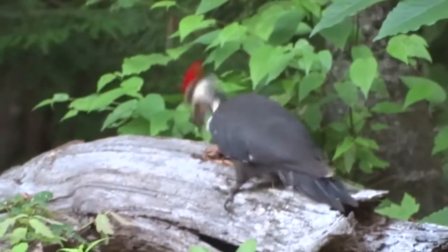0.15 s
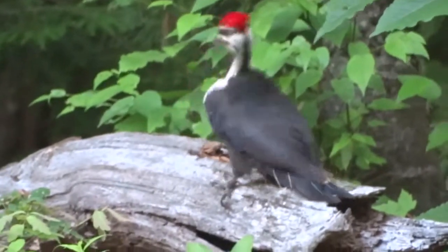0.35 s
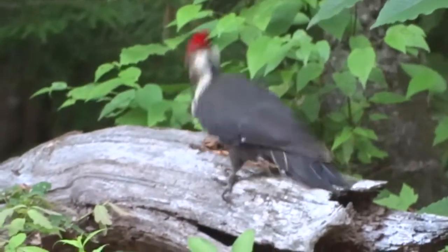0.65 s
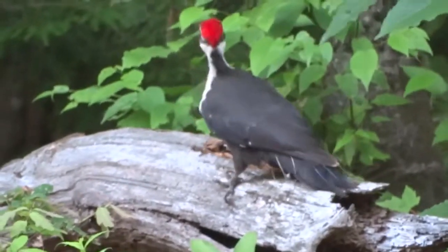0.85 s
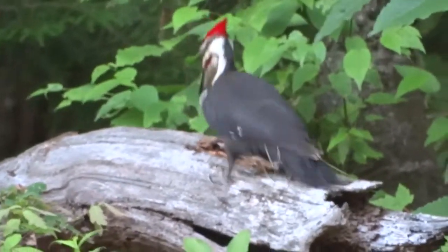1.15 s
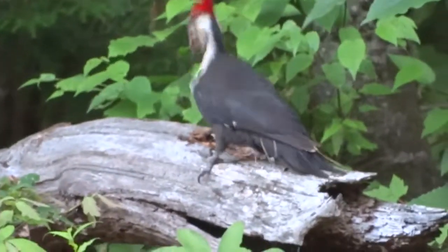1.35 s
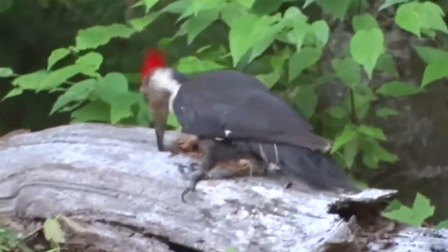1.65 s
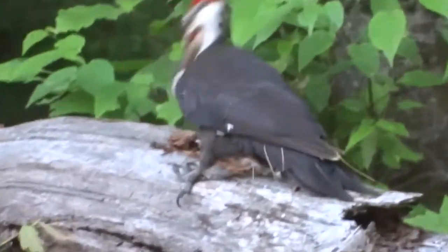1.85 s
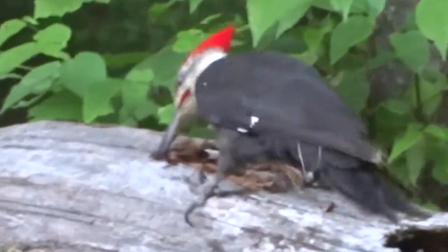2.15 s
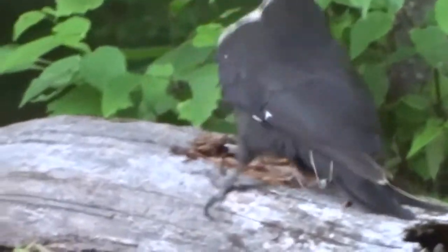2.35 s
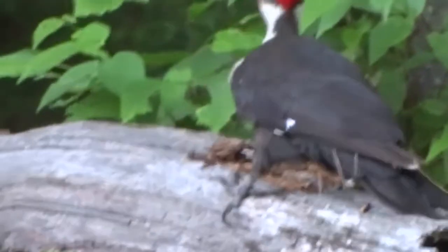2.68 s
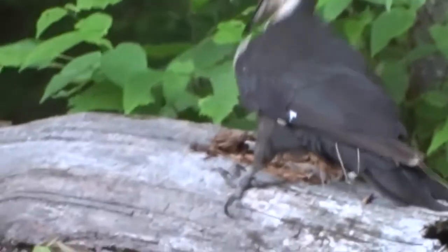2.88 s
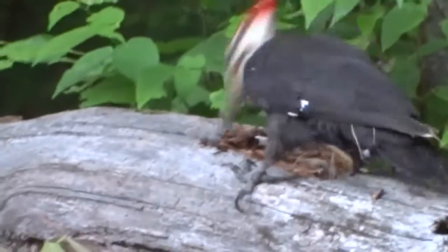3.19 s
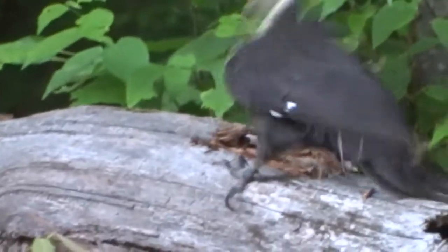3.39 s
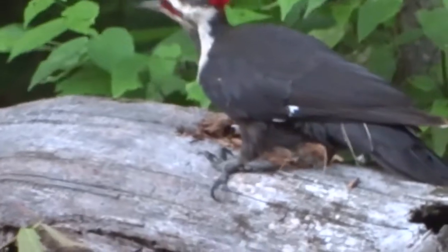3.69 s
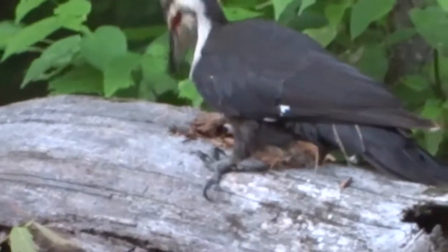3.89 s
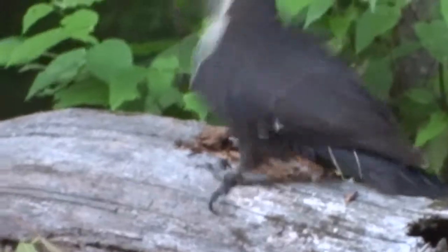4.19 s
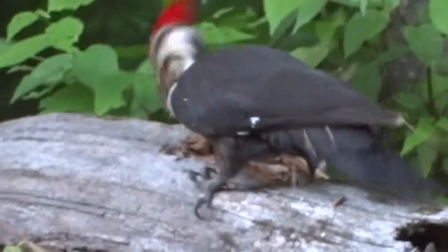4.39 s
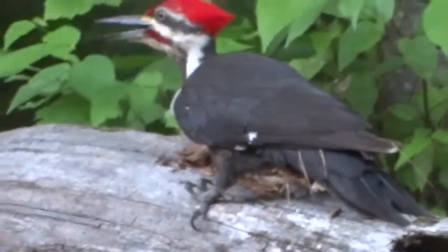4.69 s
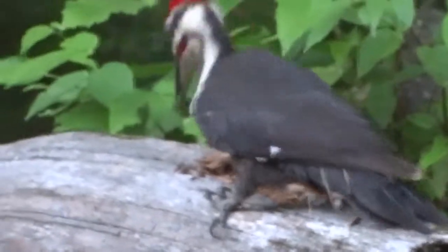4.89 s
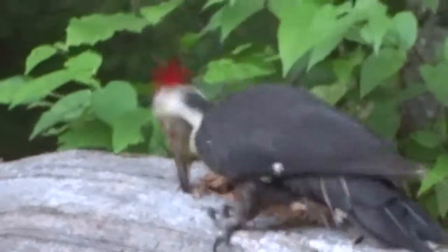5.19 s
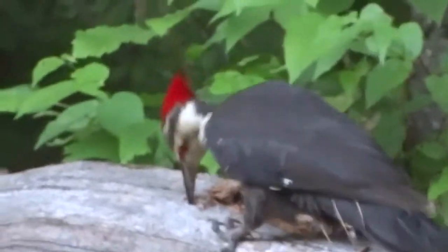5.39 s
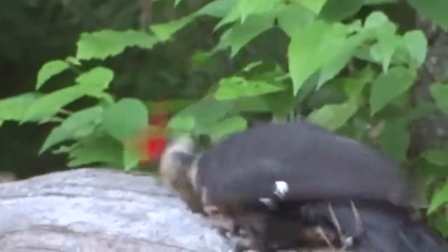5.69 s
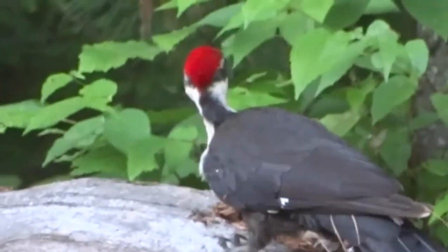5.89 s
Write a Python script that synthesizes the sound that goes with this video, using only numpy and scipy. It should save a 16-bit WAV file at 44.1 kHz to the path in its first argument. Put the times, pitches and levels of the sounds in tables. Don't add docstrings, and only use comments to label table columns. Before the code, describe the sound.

A woodpecker a few metres away pecks a rotting log: single dry, woody knocks about half a second to a second apart, some strong, some faint, with tiny splinter and chip ticks and short hissy echoes. A nearer bird buzzes during the first second or so, then thin far birds lisp. Steady bright hiss lies beneath; the small camera microphone has little bass.

```python
import sys
import numpy as np
from scipy import signal
from scipy.io import wavfile
from scipy.ndimage import uniform_filter1d

SR = 44100
rng = np.random.default_rng(int(sys.argv[2]) if len(sys.argv) > 2 else 0)


def gain_from_decibels(decibels):
    exponent = np.asarray(decibels, float) / 20
    return 10 ** exponent


def generate_wav(sig):
    pcm = np.round(np.clip(np.atleast_2d(sig).T, -1, 1) * 32767).astype(np.int16)
    wavfile.write(sys.argv[1], SR, pcm)


N = 266496


def evened(x):
    return x / np.sqrt(np.mean(x ** 2) + 1e-20)


def read(points, hz):
    f, value = np.transpose(points)
    return np.interp(np.log(hz + 1), np.log(f + 1), value)


def add(mix, s, sound):
    part = mix[..., round(s * SR):][..., :sound.shape[-1]]
    part += sound[..., :part.shape[-1]]


def resonate(x, hz, width):
    turn = np.exp(2j * np.pi * np.cumsum(hz * np.ones(len(x))) / SR)
    r = np.exp(-np.pi * width / SR)
    smooth = signal.lfilter([(1 - r) ** 2], [1, -2 * r, r * r], x / turn + 1e-18)
    return 2 * (turn * smooth).real


LEAN = 0.062


def ports(mid, side):
    return np.array([(1 - LEAN) * mid + side, (1 + LEAN) * mid - side])


# (frequency [Hz], level [dB])
PORT_DIFFERENCE = [(100, -14), (400, -9.5), (1000, -11), (1700, -11), (2600, -11), (4000, -15.5),
                   (5200, -16.5), (6000, -11), (6800, -7.5), (7800, 3.5), (9500, 1), (11000, -3.5)]


def spread(hz, db=0):
    return gain_from_decibels(read(PORT_DIFFERENCE, hz) + db)


# (frequency [Hz], level per Hz [dB])
HISS_COLOUR = [(40, -46), (75, -46), (232, -34.5), (481, -21), (637, -16.5), (949, -11), (1630, -14.5),
               (1790, -11.5), (2320, -10.5), (4300, -2.5), (4950, 1), (5390, -1.5), (6060, -15.5),
               (7400, -25.5), (10900, -49.5), (14200, -76.5), (22000, -120)]


def noise(field_db, frames, size):
    hz = np.fft.rfftfreq(size, 1 / SR)[:, None]
    t = np.arange(frames) * (size // 4) / SR
    a, b, c, d = rng.standard_normal((frames, len(hz), 4)).T
    spectra = ports(a + 1j * b, spread(hz) * (c + 1j * d))
    spectra = spectra * gain_from_decibels(read(HISS_COLOUR, hz) + field_db(hz, t))
    return signal.istft(spectra, nperseg=size, noverlap=size * 3 // 4)[1]


# (time [s], level [dB])
HISS_LOUDNESS = [(0.0, -47), (0.6, -46), (1.55, -49), (2.27, -48.5), (2.82, -49.5), (3.5, -49), (4.8, -51),
                 (5.7, -51.5), (6.04, -50)]


def hiss(patchy_db=0.58, gust_db=3.5):
    s, level_db = np.transpose(HISS_LOUDNESS)
    frames = N // 256 + 5
    patches = uniform_filter1d(rng.standard_normal((frames, 513)), size=14, axis=0)
    patches = evened(uniform_filter1d(patches, size=12, axis=1)).T

    def field_db(hz, t):
        return (patchy_db + gust_db / (1 + (hz / 130) ** 2)) * patches

    x = noise(field_db, frames, size=1024)
    return evened(x[:, :N]) * gain_from_decibels(np.interp(np.arange(N) / SR, s, level_db) + 4.5)


# (start [s], length [s], level [dB], top pitch [Hz], share of wide noise [0-1])
BUZZ_NOTES = [
    (-0.08, 0.27, -42.5, 5300, 0.04),
    (0.192, 0.28, -36.5, 5140, 0.15),
    (0.547, 0.12, -38, 4810, 0.25),
    (0.607, 0.23, -38.5, 5180, .5),
    (0.817, 0.062, -47, 5130, 0.7),
    (0.9, 0.21, -43.5, 5270, 0.7),
    (1.052, 0.4, -49, 5200, 0.7),
    (1.271, 0.18, -52, 5200, 0.5),
]


def buzz():
    ends_db = -10
    sag, sag_end = 0.13, 0.15
    t = np.arange(N) / SR
    start, length, top_db, top_hz, husky = np.transpose(BUZZ_NOTES)
    note = np.clip(np.searchsorted(start, t) - 1, 0, None)
    phase = (t - start[note]) / length[note]
    drop = 1 - np.sin(np.pi * np.clip(phase, 0, 1) ** 0.78)
    fade = np.exp(-np.maximum(phase - 1, 0) * length[note] / 0.045)
    level = gain_from_decibels(top_db[note] + ends_db * drop) * fade
    hz = top_hz[note] * (1 - sag * drop * np.interp(phase, [.4, .6], [1, sag_end]))
    wide = np.clip(husky[note], 0, 1)

    def voice():
        narrow_part = evened(resonate(rng.standard_normal(N), hz, 210))
        wide_part = evened(resonate(rng.standard_normal(N), 0.932 * hz, 700))
        return np.sqrt(1 - wide) * narrow_part + np.sqrt(wide) * wide_part

    return ports(voice(), gain_from_decibels(-31.0) * voice()) * uniform_filter1d(level, size=200)


# (frequency [Hz], level [dB])
ECHO_COLOUR = [(300, -11.5), (1000, 1), (1700, 0), (2500, -3.5), (4100, -3.5), (5200, 4.5), (6000, 0),
               (7500, 6.5), (11000, 14)]
# (frequency [Hz], time [s])
ECHO_T60 = [(500, 0.51), (2000, 0.98), (5000, 0.62), (9000, 0.47)]


def echo(level_db, grain_db=1.2):
    lumps = evened(uniform_filter1d(rng.standard_normal(320), size=3))

    def field_db(hz, t):
        fall_db = 60 * t / np.maximum(read(ECHO_T60, hz), .03)
        return read(ECHO_COLOUR, hz) - fall_db + grain_db * lumps

    x = noise(field_db, 320, size=256)
    t = np.arange(x.shape[1]) / SR
    arrival = 1 - np.exp(-(t / 0.007) ** 3)
    return gain_from_decibels(level_db) * x / np.sqrt(np.mean(x[:, :3000] ** 2)) * arrival


def earlier_echo():
    out = np.zeros((2, N))
    add(out, 0, echo(-39.5)[:, round(0.044 * SR):])
    return out


# (time [s], peak level [dB], pitch [Hz], width [Hz])
CHIP_TICKS = [(.5501, -29, 4400, 1100), (1.1432, -40, 2300, 1500), (1.1600, -36, 1650, 700),
              (1.1602, -36, 2450, 700), (1.1826, -37, 2300, 1500), (1.1826, -39, 3600, 700),
              (1.68, -40, 3840, 800), (1.742, -45, 2300, 500), (2.11, -45, 1720, 350),
              (3.213, -42, 4050, 350), (3.213, -44, 3300, 400), (3.213, -47, 2300, 300),
              (3.2465, -41, 4050, 350), (5.8032, -32, 4600, 1100), (5.8032, -38, 1600, 900),
              (5.815, -37, 2400, 600), (5.8195, -32, 5150, 500), (5.824, -36, 5000, 600)]


def chips():
    out = np.zeros(N)
    t = np.arange(900) / SR
    for s, peak_db, hz, width in CHIP_TICKS:
        rattle = 0.1 * rng.standard_normal(len(t)) * np.exp(-t / 0.0058)
        tick = resonate((t == 0) + rattle, hz, width)
        add(out, s, gain_from_decibels(peak_db) * tick / abs(tick).max())
    return ports(out, 0 * out)


def splintering():
    t = np.arange(1500) / SR
    snaps = rng.random(1500) < .04
    return rng.standard_normal(1500) * snaps * np.exp(-t / 0.0022)


def ring(modes, cracks, peak_db, stop_s):
    t = np.arange(len(cracks)) / SR
    body = np.zeros(len(t))
    for k, (hz, width, db) in enumerate(modes):
        swell = 1 - np.exp(-(t * np.clip(hz, 1300, 4000) / 2.4) ** 2)
        tone = np.sin(2 * np.pi * hz * t) * np.exp(-np.pi * width * t)
        body += (-1) ** k * gain_from_decibels(db) * tone * swell
    body = body * np.exp(-(t / stop_s) ** 4)
    x = body + .18 * np.convolve(cracks, body)[:len(t)]
    return gain_from_decibels(peak_db + 1.0) * x / abs(x).max()


# (time [s], main ring peak [dB], then shell, bill and splinter modes relative to it [dB])
BLOWS = [
    (0.551, -23, -3.5, -21, 0),
    (1.6245, -28.5, -0.5, -19, -22),
    (2.1845, -23, -4, -2, -6),
    (2.5546, -37.5, 4, 6, 8),
    (3.1653, -29.5, -22, 3.5, -4),
    (3.544, -26.5, 1.5, -0.5, -8),
    (4.3543, -20.5, -4.5, -6, -2.5),
    (5.223, -34.5, -1, -5, 8),
    (5.805, -31, -4, 0.5, 3.5),
    (5.81, -30.5, -13, -2, 3),
]
# (level of each relative to the main ring [dB], four columns)
CAVITY_LEVELS = [(-17.5, -39, -7.5, -5), (-18.5, -7.5, -19, -38), (-37, -23.5, -31, -31),
                 (-8.5, -6, -5, -18), (-34, -11.5, -15, -28), (-20, -19, -15.5, -22),
                 (-22, -16.5, -23.5, -16), (-19, -36, -13, -14), (-31, -12, -4, -12), (-33, -18, -13, -19)]
# (thud [dB], bill tip [dB], echo [dB], all relative to the main ring,
# upper splinter mode over the lower [dB])
BLOW_EXTRAS = [(-26, -27, -18, 0), (-19, -27, -24, 6), (-34, -20, -23.5, 5), (-28, -9.5, -11, 17),
               (-23, -20, -20.5, -5), (-45, -31, -22, 9), (-38, -19, -19, 0), (-30, -13.5, -11.5, 11),
               (-42, -18, -12.5, 8), (-45, -24, -15.5, -2)]
# (pitch [Hz], width [Hz], level [dB])
LOG_MODES = [
    [(4005, 180, 0)],
    [(2285, 100, 0)],
    [(3160, 200, 0), (3400, 200, -2)],
    [(4610, 200, 0), (5200, 250, -1)],
    [(7310, 280, 0), (8390, 280, -8)],
]
PUSH = [1, 1, 1, -1, 1]
# (pitch [Hz], width [Hz])
CAVITIES = [
    (890, 120),
    (1160, 32),
    (1435, 25),
    (1860, 240),
]
# (pitch [Hz], width [Hz], level relative to the main ring [dB])
SPLIT = [(3680, 330, -5), (4950, 500, -10)]


def woodpecker():
    mid, side, echoes = np.zeros(N), np.zeros(N), np.zeros((2, N))
    for blow, cavity_db, extras in zip(BLOWS, CAVITY_LEVELS, BLOW_EXTRAS):
        s, peak_db, shell_db, bill_db, splinter_db = blow
        thud_db, tip_db, echo_db, sharp_db = extras
        cracks = splintering()
        low, (upper_hz, upper_width, upper_db) = LOG_MODES[3]
        splinters = [low, (upper_hz, upper_width, upper_db + sharp_db)]
        groups = [*LOG_MODES[:3], splinters, LOG_MODES[4]]
        group_db = [0, shell_db, bill_db, splinter_db, tip_db]
        log = [sign * ring(modes, cracks, peak_db + db, 0.0074)
               for modes, sign, db in zip(groups, PUSH, group_db)]
        knock = sum(log)
        for k, ((hz, width), db) in enumerate(zip(CAVITIES, cavity_db)):
            knock = knock + (-1) ** k * ring([(hz, width, 0)], cracks, peak_db + db, .0072)
        for hz, width, db in SPLIT:
            split = ring([(hz, width, 0)], cracks, peak_db + db, .0045)
            knock = knock + np.roll(split, -round(.00005 * SR))
        thud = ring([(422, 45, 0), (556, 48, -2)], 0 * cracks, peak_db + thud_db - 1.0, 0.022)
        add(mid, s + .003, thud)
        add(mid, s - .0003, knock)
        add(side, s + .00006, gain_from_decibels(-19.5) * sum(log) + gain_from_decibels(-15) * log[4])
        add(echoes, s, echo(peak_db + echo_db))
    return ports(mid, side) + echoes


# (width [Hz], glide [Hz per s], trill depth [0-1],
# calls as (start [s], length [s], first pitch [Hz], level [dB]))
FAR_CALLS = [
    (190, 400, .3, [(.8, .18, 6430, -55.5), (1.02, 0.15, 6500, -54.5), (1.22, .09, 7130, -63), (3.01, 0.16, 6250, -62)]),
    (110, -2000, .2, [(1.16, 0.054, 5880, -53.5), (1.35, .05, 5680, -51)]),
    (100, 60, .95, [(3.53, .47, 6240, -59), (3.66, .27, 6200, -56.5), (3.71, .12, 7880, -66), (3.55, .36, 7900, -66.5), (1.2, .3, 6590, -66)]),
    (25, -450, .2, [(1.44, 0.15, 1170, -58.5), (1.45, 0.11, 1390, -62)]),
    (350, -100, .2, [(3.23, .15, 7150, -68), (.56, 0.07, 6400, -64), (2.98, 0.2, 7880, -67), (3.21, 0.15, 7880, -67), (5.9, .14, 1480, -63.5)]),
    (800, 148, .2, [(.7, .65, 5900, -54), (1.1, 0.47, 6000, -55), (1.4, 0.25, 6250, -55.5), (2.98, 0.49, 7300, -67), (3.9, 0.3, 7250, -69.5)]),
]


def far_birds(trill_hz=49):
    out = np.zeros((2, N))
    for width, glide, trill, calls in FAR_CALLS:
        for start, length, first_hz, db in calls:
            t = np.arange(round(length * SR)) / SR
            hz = first_hz + glide * t
            a, b = [evened(resonate(rng.standard_normal(len(t)), hz, width)) for _ in range(2)]
            throb = 1 + trill * np.sin(2 * np.pi * trill_hz * t)
            shape = signal.windows.tukey(len(t), .85) * throb
            add(out, start, gain_from_decibels(db) * ports(a, spread(first_hz, -4.0) * b) * shape)
    return out


def scene():
    animals = buzz() + earlier_echo() + chips() + woodpecker() + far_birds()
    capsule = signal.butter(3, [260, 8600], "band", fs=SR, output="sos")
    return hiss() + signal.sosfilt(capsule, animals)


def roll_off(x):
    return signal.sosfilt(signal.butter(12, 11040, fs=SR, output="sos"), x)


def record(dry):
    band_limit = signal.ellip(8, .3, 45, 11090, fs=SR, output="sos")
    finished = signal.sosfilt(band_limit, dry)
    return roll_off(finished)


dry = scene()
out = record(dry)
generate_wav(out)
```